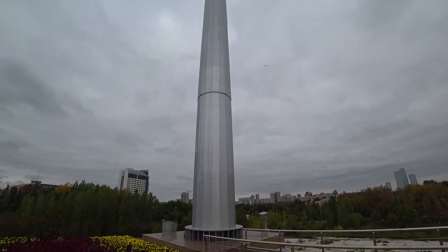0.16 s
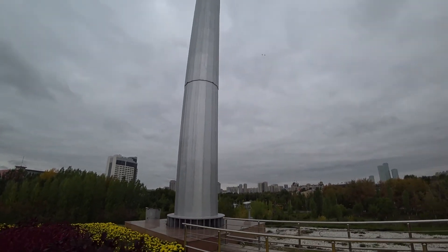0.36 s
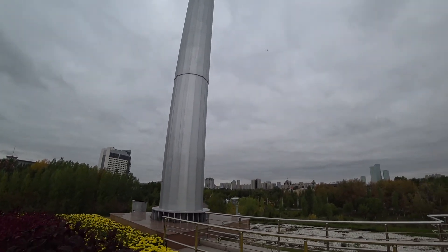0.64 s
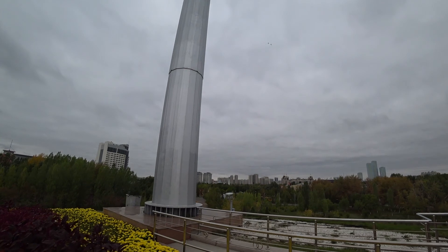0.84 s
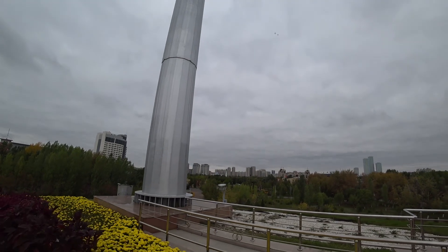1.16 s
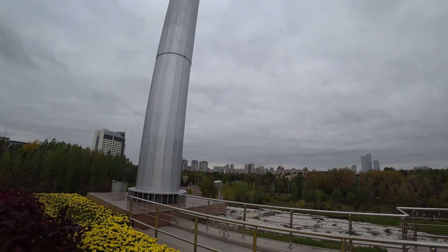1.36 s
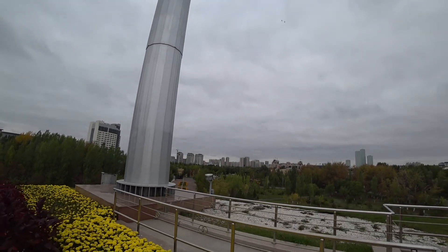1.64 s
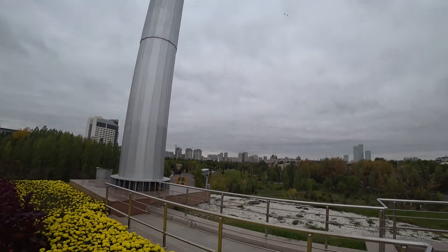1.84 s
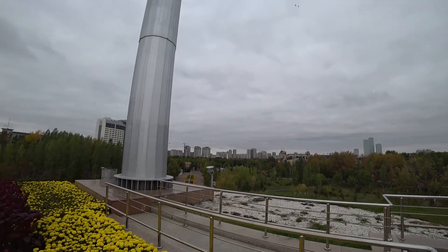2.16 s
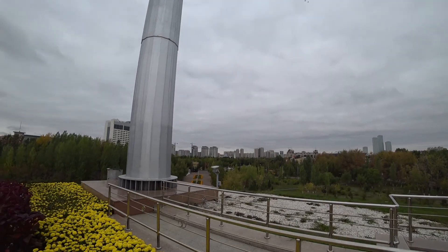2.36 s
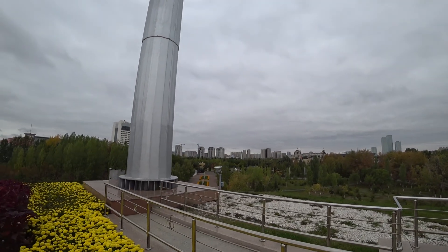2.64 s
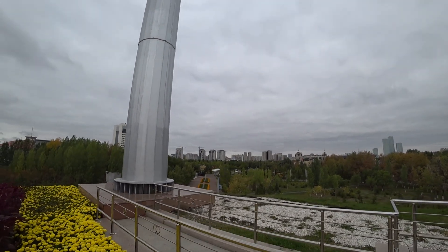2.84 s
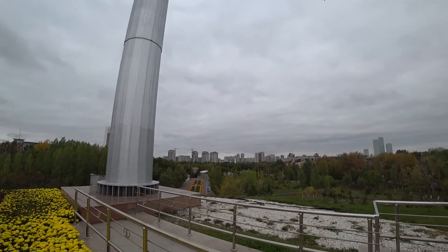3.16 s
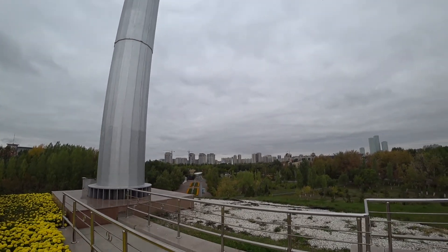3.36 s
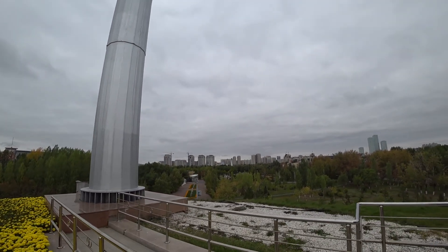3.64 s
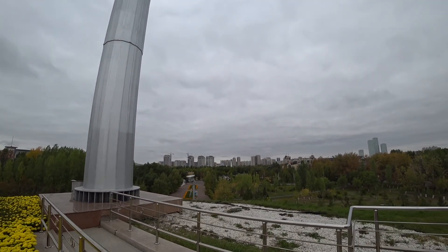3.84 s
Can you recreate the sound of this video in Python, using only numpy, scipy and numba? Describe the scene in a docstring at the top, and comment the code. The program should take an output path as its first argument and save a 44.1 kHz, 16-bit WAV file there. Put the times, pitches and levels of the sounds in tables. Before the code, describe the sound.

Wind buffeting a bare microphone outdoors, loud at first, sinking darker, then returning with thuds.

```python
"""Gusty wind on a camera's two microphone ports, on an open terrace above a city park.
A fast gust opens: eddies blown past the ports roar, with struck buffets and sharp snaps on top.
From 0.3 to 0.87 s regular vortices sound a hoot; then the air slows and the roar sinks and darkens.
From about 3 s it quickens again and buffets return; a low rumble rises and falls throughout.
Behind it all: a wash of far traffic, a swelling noise hiss, probably leaves, and a faint camera whine."""
import sys
import numpy as np
from scipy import signal
from scipy.fft import rfft, irfft
from scipy.io import wavfile
from scipy.ndimage import uniform_filter1d, minimum_filter1d, map_coordinates
from numba import njit

SR = 44100
rng = np.random.default_rng(int(sys.argv[2]) if len(sys.argv) > 2 else 0)


def materialize(psi):
    """Save the field psi as 16-bit PCM at rate SR to the path in sys.argv[1].

    A 1-D psi becomes a single channel; in a 2-D psi each row is a channel.
    """
    bounded = np.clip(np.atleast_2d(psi).T, -1, 1)
    quanta = np.round(bounded * 32767).astype(np.int16)
    wavfile.write(sys.argv[1], SR, quanta)


N = 176400


def undb(db):
    """Decibels to amplitude ratio."""
    return 10 ** (np.asarray(db) / 20)


def curve(rows, axis=1):
    """A table column against time, joined by straight lines."""
    rows = np.array(rows)
    return np.interp(np.arange(N) / SR, rows[:, 0], rows[:, axis])


def per_bin(points):
    """Points joined on a log-frequency axis, one value per FFT bin."""
    hz, value = np.array(points).T
    bin_hz = np.maximum(np.arange(N // 2 + 1) * SR / N, 1)
    return np.interp(np.log(bin_hz), np.log(hz), value)


def noise(colour):
    """Gaussian noise shaped by a spectrum, rms 1."""
    x = irfft(rfft(rng.standard_normal(N)) * undb(per_bin(colour)), N)
    return x / x.std()


def wide(colour, side_db):
    """Stereo noise: mid of rms 1, plus an independent side filtered by side_db."""
    side = irfft(rfft(noise(colour)) * undb(side_db), N)
    return noise(colour) + np.array([side, -side])


def walk(corner_hz):
    """Smooth random fluctuation of rms 1: low-passed noise, 12 dB down at corner_hz."""
    hz = np.arange(N // 2 + 1) * SR / N
    x = irfft(rfft(rng.standard_normal(N)) / (1 + (hz / corner_hz) ** 2) ** 2, N)
    return x / x.std()


# phase by which the right port leads: frequency_hz, lead_rad
PORT_LEAD = [(30, 0.27), (80, 1.07), (140, 1.52), (220, 1.86), (400, 2.29), (700, 2.34), (2500, 3.02)]


def across_ports(x):
    """Pressure carried by the air reaches the right port before the left."""
    half_turn = np.exp(.5j * per_bin(PORT_LEAD))
    return irfft(rfft(x) * np.array([1 / half_turn, half_turn]), N)


# eddy passing rate, before stir and jitter: time_s, rate_hz
FLOW = [(0, 483.5), (.035, 318.9), (.085, 309.6), (.105, 439.9), (.128, 370.4), (.155, 509.7), (.19, 390.4),
        (.255, 340.4), (.32, 399.3), (.375, 371.6), (.41, 380.3), (.46, 262.3), (.51, 169.9), (.56, 204.8),
        (.635, 160.1), (.69, 275.2), (.74, 275.2), (.8, 225), (.86, 214.8), (.915, 270.7), (.94, 158.5),
        (1.03, 210), (1.075, 175.8), (1.11, 114), (1.15, 309.6), (1.185, 391), (1.22, 311.3),
        (1.275, 144.9), (1.33, 140.1), (1.38, 90.2), (1.45, 111.1), (1.53, 136.8), (1.68, 104.8),
        (1.85, 107.7), (2.2, 95.18), (2.4, 79.8), (2.7, 85.33), (3.03, 140.2), (3.1, 99.77), (3.22, 144.8),
        (3.29, 159.8), (3.35, 160.4), (3.42, 200), (3.5, 249.3), (3.56, 199.3), (3.62, 130.2),
        (3.72, 106.4), (3.8, 160.4), (3.89, 129.5), (3.95, 185.8), (4, 251)]
# eddy spectrum when the rate is REF_HZ: frequency_hz, density_db_per_hz (relative)
EDDIES = [(5, -19), (30, -23), (120, -12), (250, 1), (380, -1), (600, -2.5), (850, -7), (1200, -15.5),
          (2000, -30), (3500, -68), (8000, -78.5)]
REF_HZ = 500
WIND_CEILING_DB, KNEE_HZ, GROWTH_EXPONENT = -16, 270, 2.34
SPEED_JITTER_LOG_RMS, SPEED_JITTER_HZ = .13, 151.8
EVEN_S = 0.00806  # window that evens the field's power, at REF_HZ
PATCH_RMS_DB, OWN_PORT_DB = 3.5, -13.5
BUFFET_STIR = .2  # share of a buffet's pitch added to the rate
LOCK_DB = -18.5  # hoot level that takes half the turbulence power


def eddies(place):
    """Frozen patchy turbulence read along the air's path: faster air raises its pitch."""
    field = noise(EDDIES)
    local_power = uniform_filter1d(field ** 2, int(EVEN_S * SR), mode="wrap")
    field = field / np.sqrt(local_power)
    patches = undb(PATCH_RMS_DB * walk(200))
    patches = patches / np.sqrt(np.mean(patches ** 2))
    return map_coordinates(field * patches, [place], order=3, mode="mirror")


def turbulence():
    """Faster air is higher and louder, levelling off past a knee; buffets stir it, the hoot calms it."""
    stir = sum(pitch * swell(at, fall, pitch) for at, fall, pitch, db in BUFFETS)
    rate_hz = np.maximum(curve(FLOW) + BUFFET_STIR * stir, 20)
    jitter = np.exp(SPEED_JITTER_LOG_RMS * walk(SPEED_JITTER_HZ))
    place = np.cumsum(rate_hz * jitter) / REF_HZ

    force = undb(WIND_CEILING_DB) / np.sqrt(1 + (KNEE_HZ / rate_hz) ** (2 * GROWTH_EXPONENT))
    force = force / np.sqrt(1 + (hoot_size() / undb(LOCK_DB)) ** 2)
    shared = across_ports(force * eddies(place))
    own = force * np.array([eddies(place), eddies(place)])
    return shared + undb(OWN_PORT_DB) * own


BUFFET_RISE_CYCLES = 0.4467


def swell(at_s, fall_s, hz):
    """Envelope of one vortex: Gaussian rise within a swing, slower exponential decay."""
    t = np.arange(N) / SR - at_s
    rise = (t * hz / BUFFET_RISE_CYCLES) ** 2
    return np.exp(-np.minimum(np.where(t < 0, rise, t / fall_s), 30))


def push_pull(at_s, hz):
    """One lone swing of pressure, peak 1, as an eddy crosses a port."""
    u = np.clip(2 * np.pi * hz * (np.arange(N) / SR - at_s), -10, 10)
    return u * np.exp((1 - u ** 2) / 2)


# single strong vortices: peak_s, decay_s, pitch_hz (before wobble and sag), level_db (before BUFFET_GAIN_DB)
BUFFETS = [(.004, 0.01187, 443.5, -2.5), (.104, 0.01402, 620, -4), (.209, 0.00804, 480.6, -4.5),
           (0.232, 0.00786, 374, -10), (0.267, 0.0085, 481, -16), (.306, 0.01212, 399.5, -12.5),
           (.39, 0.00395, 530, -3), (.526, 0.0072, 216, -6.5), (.595, 0.02185, 314, -5),
           (0.678, 0.0159, 328, -6.5), (0.718, 0.008024, 418, -6), (.748, .012, 373, -15),
           (0.776, 0.014, 312, -14), (0.833, 0.013, 239.7, -9), (.872, 0.0067, 307.5, -6),
           (.894, 0.0085, 302.5, -14), (.905, 0.01399, 347.7, -5.5), (.991, 0.00496, 402, -7),
           (1.034, 0.00776, 303, -13), (1.15, 0.0208, 237.4, -10.5), (1.185, 0.0124, 300, -5.5),
           (1.247, 0.00586, 380, -5), (1.293, 0.0062, 242, -7), (1.315, 0.014, 367, -5.5),
           (1.432, .012, 150, -19), (1.478, 0.0052, 280, -8), (1.739, 0.01213, 349.7, -4),
           (1.777, .012, 166, -14), (1.958, 0.012, 226, -8.5), (2.028, 0.01783, 148.2, -14),
           (2.051, 0.01, 190.3, -10), (2.107, 0.0037, 247, -5.5), (2.296, 0.01204, 160, -22.5),
           (2.757, 0.0121, 170.3, -19.5), (2.828, 0.01414, 210, -19.5), (3.002, 0.013, 239, -13),
           (3.321, 0.0051, 319, -3), (3.369, 0.0131, 406, -8), (3.386, 0.02226, 249, -4),
           (3.434, 0.0166, 177.3, -7.5), (3.471, 0.0079, 276, -8), (3.49, 0.0147, 373, -9),
           (3.532, 0.00623, 364, -6.5), (3.556, 0.00597, 326, -7), (3.584, 0.0036, 227, -10),
           (3.648, 0.008, 205, -15.5), (3.961, 0.024, 188, -8), (3.987, 0.0046, 400, -7)]
BUFFET_GAIN_DB, BUFFET_OVERTONE_DB = -5.5, -24
SLAP_DB = -5  # first push and pull, against the swings
BUFFET_WOBBLE_LOG_RMS = 0.2
BUFFET_SAG = 0.36  # share of pitch lost as the buffet dies


def buffets():
    """Each strong vortex slaps the ports, then leaves a few uneven swings that slow as they fade."""
    pace = np.exp(BUFFET_WOBBLE_LOG_RMS * walk(240))
    out = np.zeros(N)
    signs = rng.choice([-1, 1], len(BUFFETS))
    for (at, fall, hz, db), sign in zip(BUFFETS, signs):
        size = swell(at, fall, hz)
        live = size > 1e-3
        size = size[live]
        pitch_hz = hz * pace[live] * (1 - BUFFET_SAG * (1 - size))
        phase = 2 * np.pi * np.cumsum(pitch_hz) / SR
        phase = phase - phase[np.argmax(size)]  # zero at the peak
        swings = size * (np.sin(phase) + undb(BUFFET_OVERTONE_DB) * np.sin(2 * phase))
        slap = undb(SLAP_DB) * push_pull(at, hz)[live]
        out[live] += sign * undb(db + BUFFET_GAIN_DB) * (swings + slap)
    return across_ports(out)


# sharp swings: centre_s, pitch_hz, level_db (before SNAP_GAIN_DB)
SNAPS = [(.009, 770, -7.5), (.049, 644, -9), (.066, 874, -5.5), (.099, 790, -9), (.102, 1164, -7.5),
         (.108, 850, -11), (.115, 750, -7.5), (.137, 680, -17), (.237, 1080, -11.5), (.315, 635, -8),
         (.363, 593, -8.5), (.391, 680, -15), (.679, 610, -16), (.718, 700, -12.5), (.875, 595, -15),
         (.904, 600, -8), (.992, 603, -10.5), (1.006, 550, -17), (1.178, 620, -12.5), (1.188, 653, -12),
         (3.498, 614, -12), (3.988, 580, -7.5)]
SNAP_GAIN_DB = -1.5


def snaps():
    """The smallest, fastest eddies crack over the ports in one sharp swing."""
    out = np.zeros(N)
    signs = rng.choice([-1, 1], len(SNAPS))
    for (at, hz, db), sign in zip(SNAPS, signs):
        out += sign * undb(db + SNAP_GAIN_DB) * push_pull(at, hz)
    return across_ports(out)


# vortex hoot, before wobble and flutter: time_s, pitch_hz, level_db
HOOT = [(.3, 451.4, -39.5), (.335, 385.4, -15.5), (.362, 320.5, -13), (.39, 390, -34), (.42, 326, -14),
        (.47, 295.6, -14.5), (.515, 280.8, -23.5), (.565, 291.7, -16.5), (.583, 295, -44.5),
        (.615, 297, -12.5), (.635, 300.8, -58), (.7, 401, -42), (.73, 368, -26.5), (.78, 302.7, -23.5),
        (.84, 252.5, -25.5), (.87, 238.5, -42)]


def hoot_size():
    """Strength of the regular shedding; zero before and after."""
    t = np.arange(N) / SR
    return undb(curve(HOOT, axis=2)) * ((t > HOOT[0][0]) & (t < HOOT[-1][0]))


# harmonics from the fundamental up, at full lock: level_db
HOOT_PARTIALS_DB = [0, -12, -23]
HOOT_WOBBLE_RMS, HOOT_FLUTTER_RMS_DB = 0.0609, 2  # wobble as a share of pitch


def hoot():
    """Air sheds regular vortices off the camera's edge; overtones grow with their strength up to full lock."""
    pitch_hz = curve(HOOT) * (1 + HOOT_WOBBLE_RMS * walk(160.5))
    phase = 2 * np.pi * np.cumsum(pitch_hz) / SR
    size = hoot_size() * undb(HOOT_FLUTTER_RMS_DB * walk(68))
    lock = np.minimum(size / undb(LOCK_DB), 1)
    tone = np.zeros(N)
    for k, db in enumerate(HOOT_PARTIALS_DB):
        tone += undb(db) * lock ** k * np.sin((k + 1) * phase)
    return across_ports(np.sqrt(2) * tone * size)


# time_s, mid_level_db
RUMBLE_LEVEL = [(0, -31.5), (.45, -39), (.75, -46), (1.1, -36.5), (1.18, -19.5), (1.4, -65), (1.62, -53),
                (1.73, -29.5), (1.87, -41.5), (2.04, -28.5), (2.15, -34.5), (2.5, -41), (3.1, -40.5),
                (3.33, -22.5), (3.58, -25.5), (3.68, -43), (3.8, -29), (3.87, -32), (3.96, -26), (4, -17)]
# frequency_hz, density_db_per_hz (relative)
RUMBLE = [(5, 1), (25, -0.5), (55, -0.5), (92, 5.5), (160, -14), (400, -41.5), (2000, -110)]


def rumble():
    """Large eddies press on both ports mostly alike: low noise with a weak side."""
    return wide(RUMBLE, side_db=-10) * undb(curve(RUMBLE_LEVEL))


# time_s, mid_level_db (before flicker)
CITY_LEVEL = [(0, -43.5), (.6, -44.5), (1.2, -43.5), (1.9, -40.5), (2.5, -40), (3.4, -41.5), (4, -40.5)]
# frequency_hz, density_db_per_hz (relative)
CITY = [(40, 2), (200, 3), (400, -2.5), (650, -1), (1000, -0.5), (1500, -7), (2200, -15), (3200, -21),
        (6000, -30.5), (10000, -37), (15500, -39)]
# frequency_hz, side_vs_mid_db
CITY_SIDE = [(100, -21.5), (700, -10.5), (1300, -5.5), (2500, -4.5), (4500, -4.5), (10000, -6.5),
             (15000, -7.5)]


def city():
    """Far traffic blurred into a wash of wide noise, flickering slightly."""
    return wide(CITY, per_bin(CITY_SIDE)) * undb(curve(CITY_LEVEL) + .5 * walk(50))


# time_s, level_db (before brightening and flicker)
LEAF_LEVEL = [(0, -61), (.12, -61), (.28, -55), (.45, -59.5), (.62, -55.5), (.85, -54), (1.17, -59.5),
              (1.29, -56), (1.43, -61.5), (1.65, -55), (1.95, -51), (2.03, -54.5), (2.45, -51.5),
              (2.68, -58.5), (2.98, -50.5), (3.23, -50), (3.47, -54), (3.5, -57), (3.66, -53.5),
              (3.93, -59)]
# frequency_hz, density_db_per_hz (relative, before brightening)
LEAVES = [(1500, -6.5), (3000, -10.5), (4400, -2.5), (5300, -3), (6500, -7), (7800, -7.5), (8900, -15.5),
          (10500, -17.5), (12000, -27.5), (15500, -36)]
LEAF_SIDE_DB, LEAF_FLICKER_RMS_DB = -30, 0.86
BRIGHT_HZ, BRIGHT_ABOVE_DB, BRIGHTENING_DB_PER_DB = 6160, -53, 1


def leaves():
    """A fine noise hiss, probably leaves, whose treble grows faster than the rest as it swells."""
    db = curve(LEAF_LEVEL)
    hiss = wide(LEAVES, LEAF_SIDE_DB)
    highpass = signal.butter(2, BRIGHT_HZ, "high", fs=SR, output="sos")
    top = signal.sosfiltfilt(highpass, hiss)
    brightened = hiss - top + top * undb(BRIGHTENING_DB_PER_DB * (db - BRIGHT_ABOVE_DB))
    return brightened * undb(db + LEAF_FLICKER_RMS_DB * walk(40))


# camera whine bands: centre_hz, width_hz, mid_level_db, side_vs_mid_db
WHINE = [(9850, 130, -84.5, 9.5), (12200, 170, -86.5, -6)]


def whine():
    """Faint camera whine: two thin steady noise bands high in the treble."""
    out = np.zeros((2, N))
    for hz, width, db, side_db in WHINE:
        band = [(hz - 2 * width, -70), (hz - width / 2, -3), (hz, 0),
                (hz + width / 2, -3), (hz + 2 * width, -70)]
        out += undb(db) * wide(band, side_db)
    return out


def scene():
    """Sum of all sources, two ports."""
    wind = turbulence() + buffets() + snaps() + hoot() + rumble()
    return wind + city() + leaves() + whine()


@njit
def held_peak(x, fall):
    """Follows peaks at once and lets go slowly."""
    out, e = np.empty(len(x)), 0.
    for i in range(len(x)):
        e = max(x[i], e * fall)
        out[i] = e
    return out


LIMIT, LIMIT_RELEASE_S, TOP_HZ = .92, .08, 15730  # LIMIT is peak amplitude


def record(dry):
    """A limiter ducks both channels under peaks over LIMIT; a steep low-pass cuts the top."""
    peak = held_peak(np.abs(dry).max(axis=0), np.exp(-1 / (LIMIT_RELEASE_S * SR)))
    gain = LIMIT / np.maximum(peak, LIMIT)
    gain = uniform_filter1d(minimum_filter1d(gain, size=129), size=129)  # look ahead, smooth
    lowpass = signal.ellip(10, .2, 80, TOP_HZ, fs=SR, output="sos")
    return signal.sosfilt(lowpass, dry * gain)


dry = scene()
out = record(dry)
materialize(out)
```